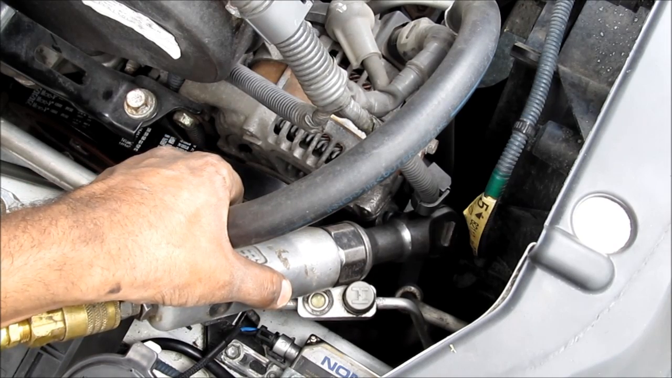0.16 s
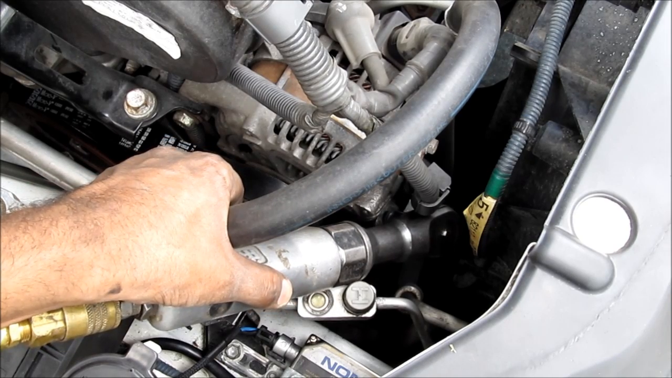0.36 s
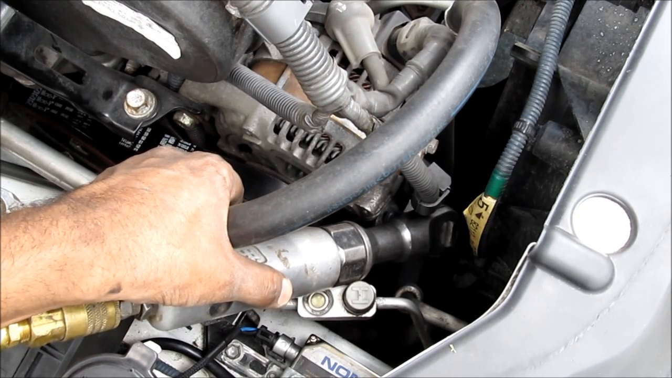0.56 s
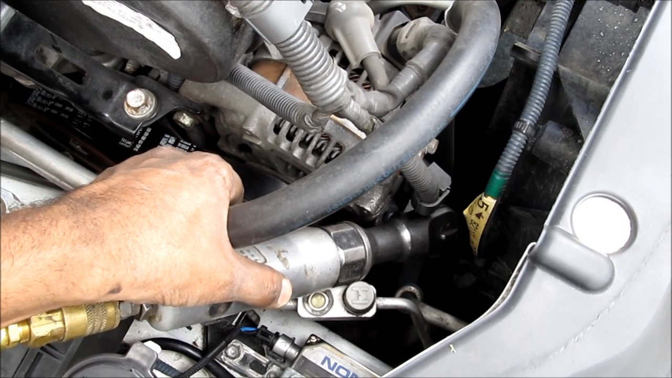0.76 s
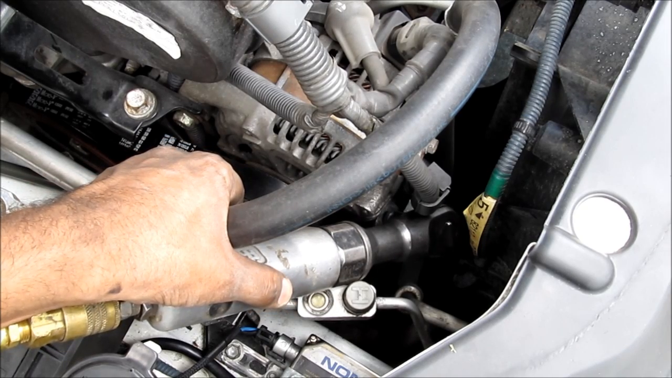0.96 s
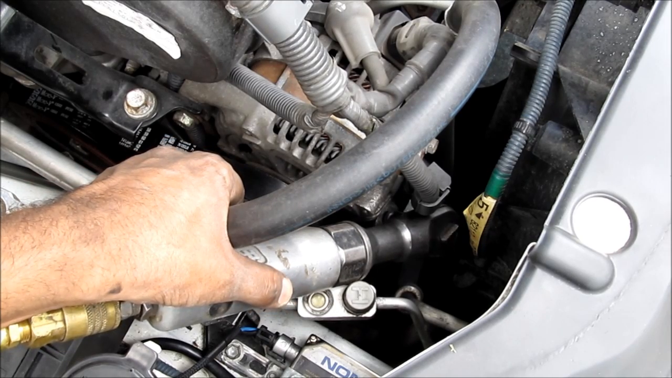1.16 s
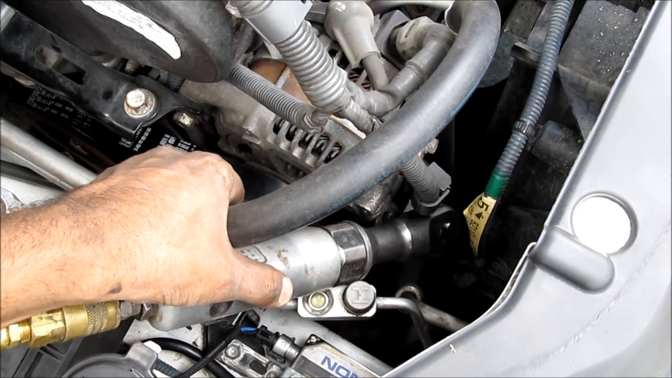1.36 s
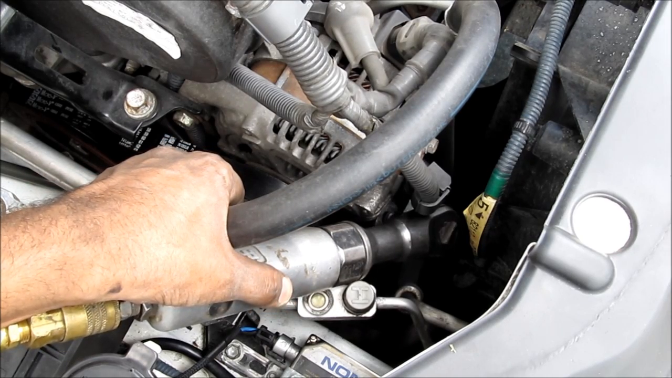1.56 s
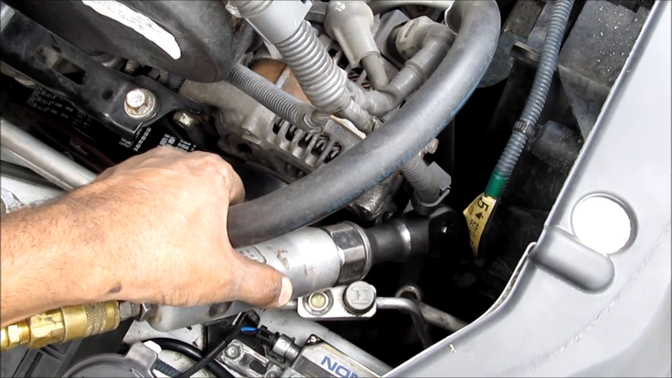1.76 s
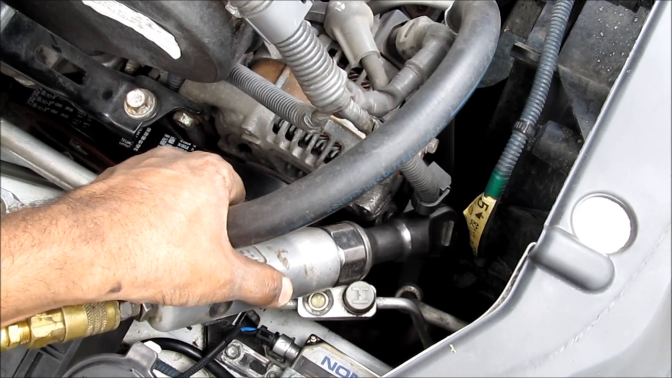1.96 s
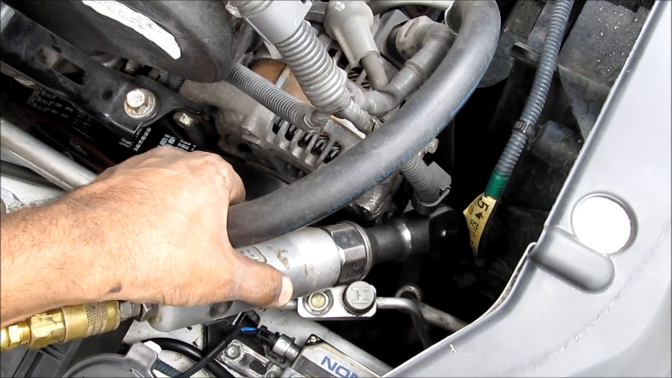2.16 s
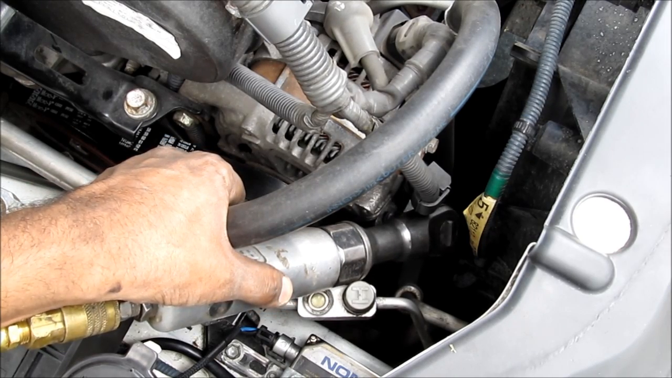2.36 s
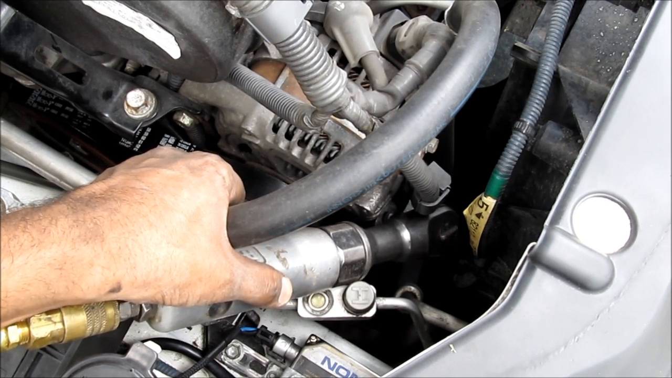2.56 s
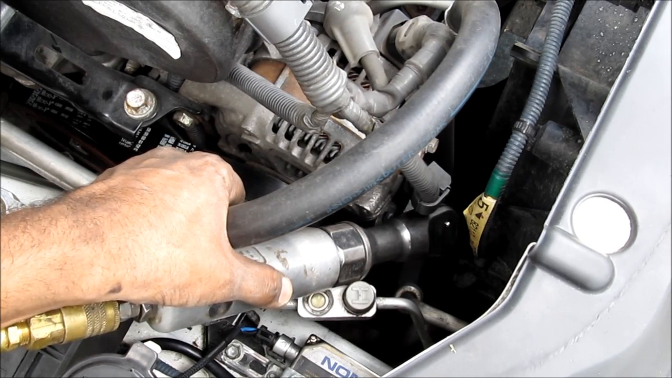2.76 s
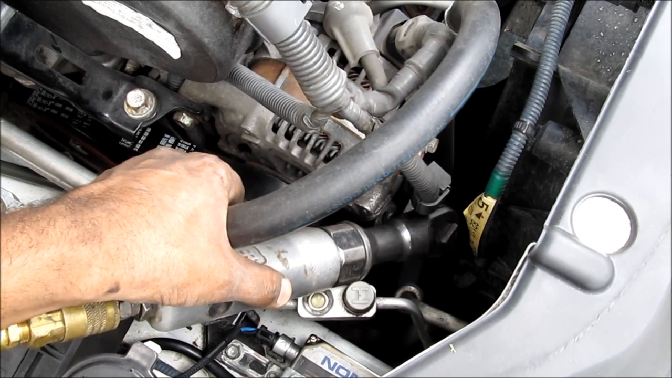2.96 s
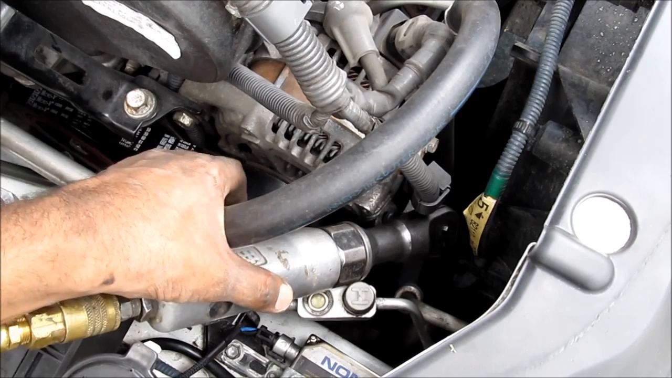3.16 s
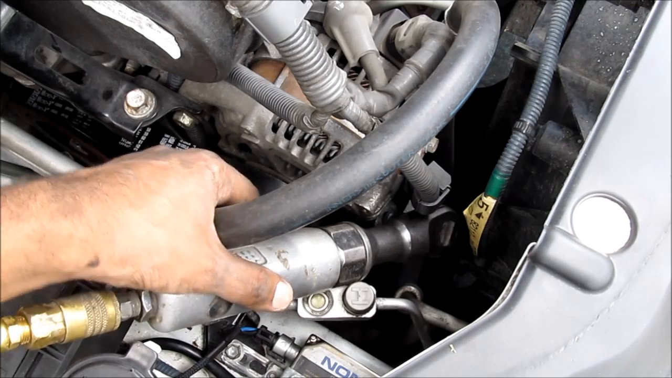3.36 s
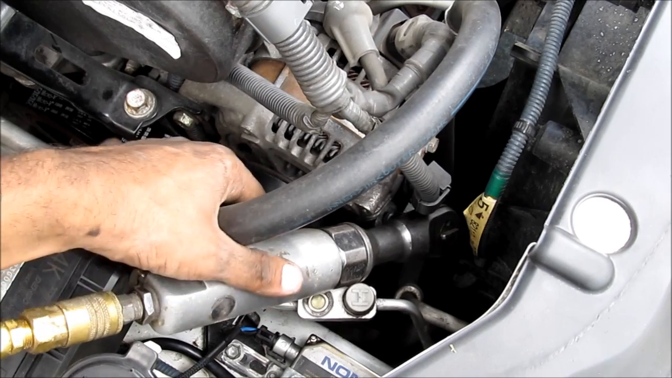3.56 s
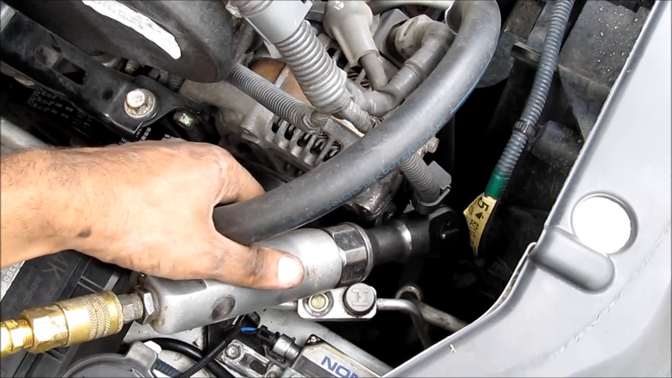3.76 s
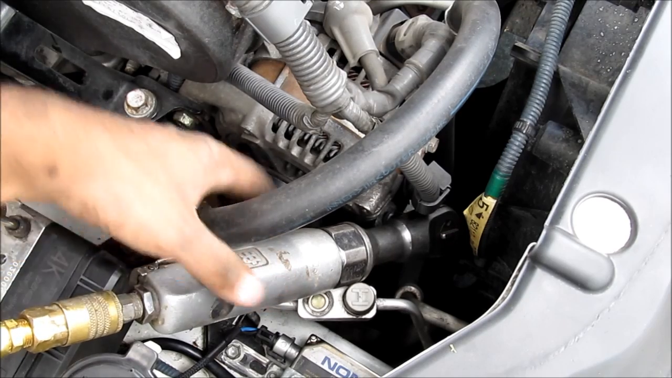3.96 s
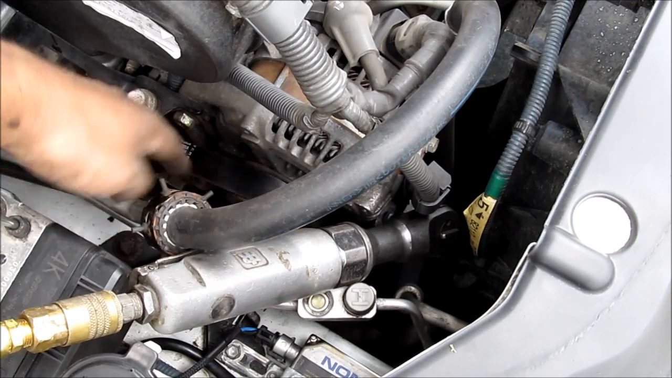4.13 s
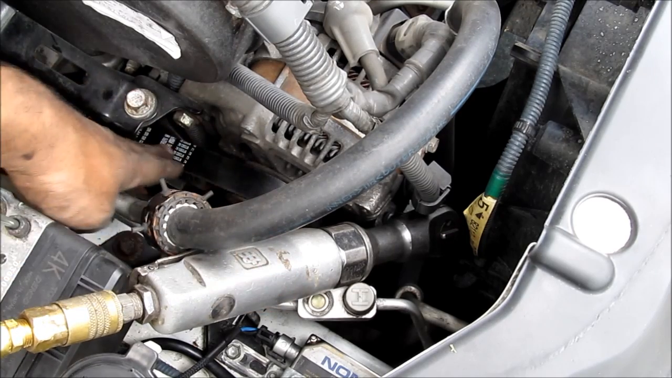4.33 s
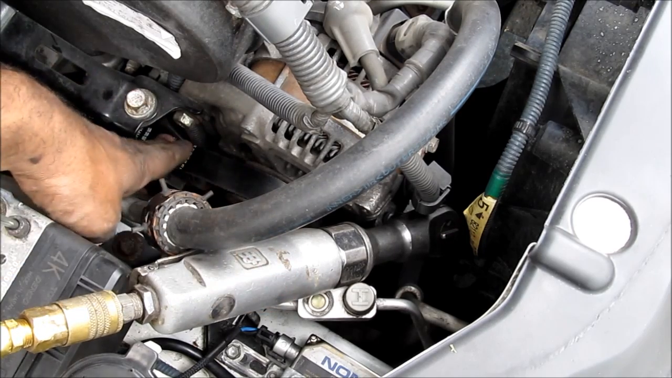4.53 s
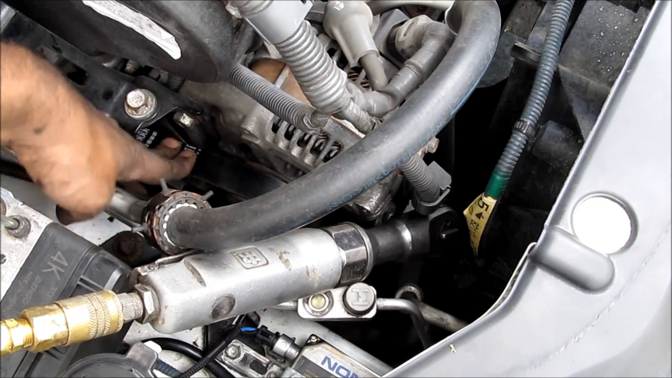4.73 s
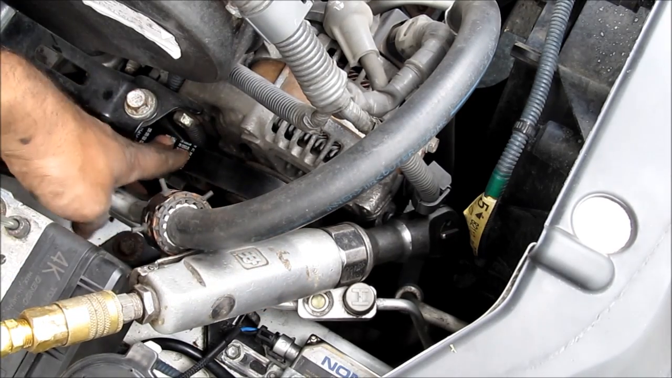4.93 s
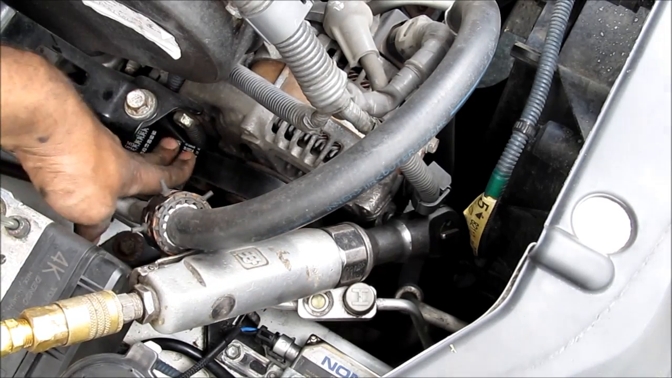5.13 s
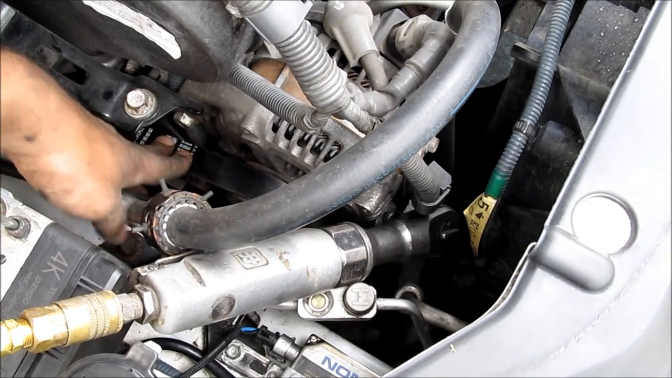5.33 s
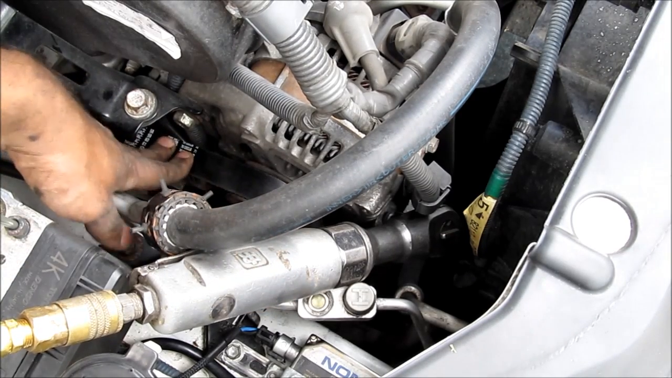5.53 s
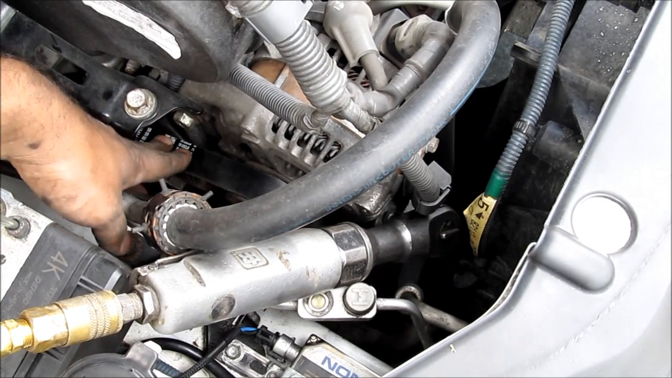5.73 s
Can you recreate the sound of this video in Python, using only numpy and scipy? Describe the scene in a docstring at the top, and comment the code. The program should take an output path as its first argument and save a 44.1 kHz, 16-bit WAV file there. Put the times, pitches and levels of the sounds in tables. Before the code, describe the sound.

A pneumatic ratchet runs close by in a car's engine bay, a bright, wide jet of exhaust air over a steady motor whine with buried metallic ticking. About halfway through, the trigger is released: the pitch drops in a quick whoop, air sighs out and the lever clicks. Then an open garage murmur slowly swells, with faint far birds and a slight hand rustle. Close stereo microphones.

```python
"""A bright jet of exhaust air over a vane motor's whine: an air ratchet spins on a bolt in a car's engine bay.
The jet is chopped, coloured noise; the whine is a stack of partials that follows the rotor.
The trigger is let go: the motor winds down with a short falling whoop, air drains, and the lever clicks home.
Then the open garage: a low outdoor murmur and a hiss, both noise, slowly swell around the microphones.
Far birds are swept and wavering tones, and a hand among the hoses is one swell of noise."""
import sys
import numpy as np
from scipy import signal
from scipy.fft import rfft, irfft
from scipy.io import wavfile
from scipy.ndimage import uniform_filter1d

SR = 44100
rng = np.random.default_rng(int(sys.argv[2]) if len(sys.argv) > 2 else 0)


def file_out(sig):
    """Save sig as 16-bit WAV at sys.argv[1]."""
    # one column per channel
    cols = np.atleast_2d(sig).T
    # limit, then scale
    lim = np.clip(cols, -1, 1)
    pcm = np.round(lim * 32767).astype(np.int16)
    wavfile.write(sys.argv[1], SR, pcm)


N = 255339
T = np.arange(N) / SR
HZ = np.fft.rfftfreq(N, 1 / SR)


def gain_of(db):
    """Decibels to a factor."""
    return 10 ** (np.asarray(db) / 20)


def evened(x):
    """Scales to rms 1."""
    return x / np.sqrt(np.mean(x ** 2) + 1e-20)


def read(points, hz):
    """Reads a spectrum table, joined on a log-frequency axis."""
    f, value = np.transpose(points)
    return np.interp(np.log(hz + 1), np.log(f + 1), value)


def add(mix, s, sound):
    """Lays a sound into the mix at time s."""
    part = mix[..., round(s * SR):][..., :sound.shape[-1]]
    part += sound[..., :part.shape[-1]]


def wander(hz):
    """Slow chance of rms 1, up to about hz changes a second."""
    return evened(irfft(rfft(rng.standard_normal(N)) * np.exp(-(HZ / hz) ** 2), N))


def swell(peak_s, rise_s, fall_s, db):
    """A rounded hump of gain that peaks at db; rise and fall each span 20 dB."""
    side_s = np.where(T < peak_s, rise_s, fall_s)
    return gain_of(db - 20 * ((T - peak_s) / side_s) ** 2)


def noise(colour_db, likeness):
    """Coloured stereo noise of rms 1 whose channels are alike by a table."""
    a, b = rfft(rng.standard_normal((2, N)))
    same = np.clip(read(likeness, HZ), -1, 1)
    mid = a * np.sqrt(1 + same)
    side = b * np.sqrt(1 - same)
    return evened(irfft(np.array([mid + side, mid - side]) * gain_of(colour_db), N))


def tint(x, colour_db):
    """Filters by a spectrum in dB, to rms 1."""
    return evened(irfft(rfft(x) * gain_of(colour_db), N))


def turbulent(x, patchy_db, flicker_db):
    """Eddies lift and drop patches of the spectrum: broad slow ones and small quick ones."""
    z = signal.stft(x, nperseg=256, noverlap=192)[2]
    slow, quick = rng.standard_normal((2, *z.shape[1:]))
    # axis 0 is frequency, axis 1 is time
    slow = uniform_filter1d(uniform_filter1d(slow, size=36, axis=1), size=22, axis=0)
    quick = uniform_filter1d(uniform_filter1d(quick, size=7, axis=1), size=9, axis=0)
    z = z * gain_of(patchy_db * evened(slow) + flicker_db * evened(quick))
    return signal.istft(z, nperseg=256, noverlap=192)[1][:, :N]


def reflect(x, t60, wet_db, dull_hz=np.inf):
    """Adds a dying tail of reflections, different at each ear and weaker above dull_hz."""
    t = T[:SR // 2]
    dulling = 1 / (1 + (np.fft.rfftfreq(len(t), 1 / SR) / dull_hz) ** 2)
    taps = irfft(rfft(rng.standard_normal((2, len(t)))) * dulling, len(t))
    tail = taps * gain_of(-60 * t / t60) * (t > .002)
    tail /= np.linalg.norm(tail, axis=1, keepdims=True)
    return x + gain_of(wet_db) * signal.fftconvolve(np.atleast_2d(x), tail, axes=1)[:, :N]


SHUT_S, SHUT_TIME_S = 3.5, .021  # the valve is half shut at SHUT_S; how gradually it closes


def valve():
    """How far the throttle is open: 1 while the trigger is held, then smoothly down to 0."""
    return .5 - .5 * np.tanh((T - SHUT_S) / (2 * SHUT_TIME_S))


# Speed of the motor while the trigger is held: (time [s], vane pulses per second [Hz])
HELD_SPEED = [(0.0, 1048), (0.48, 1029), (1.29, 1020), (2.96, 1018), (3.3, 984), (3.42, 984.8)]


def held_speed():
    """The vane rate in Hz under air, before any coasting."""
    s, hz = np.transpose(HELD_SPEED)
    return np.interp(T, s, hz)


def airflow(usual_hz=1020, drive_db_per_hz=.0125):
    """The air through the tool, 1 at its usual speed; more air makes it both faster and louder."""
    return valve() * gain_of(drive_db_per_hz * (held_speed() - usual_hz))


def rotor(jitter=.002, jitter_hz=25, coast_s=3.474, half_speed_s=.066, coast_power=2.1):
    """The vane rate, a little unsteady, and the count of vanes passed; from coast_s the rotor slows,
    and it is at half speed half_speed_s later."""
    coast = 1 / (1 + (np.maximum(T - coast_s, 0) / half_speed_s) ** coast_power)
    hz = held_speed() * coast * (1 + jitter * wander(jitter_hz))
    vanes_passed = np.cumsum(hz) / SR
    return hz, vanes_passed


def bay(x, echo_db=-17, count=24):
    """Hard parts all round the tool return the jet 1 to 16 ms later and comb its spectrum."""
    delays_s = rng.uniform(.001, .016, (2, count))
    taps = np.zeros((2, N))
    np.put_along_axis(taps, (delays_s * SR).astype(int), rng.choice([-1., 1.], delays_s.shape), 1)
    treble = HZ / (HZ + 1500)  # small parts reflect short waves best
    echoes = gain_of(echo_db) * treble * rfft(taps) / np.sqrt(count)
    return evened(irfft(rfft(x) * (1 + echoes), N))


# Broad colour of the jet: (frequency [Hz], relative level per Hz [dB])
JET_SPECTRUM = [(25, -60), (50, -45.5), (90, -29.5), (200, -24.5), (330, -16.5), (650, -14.5), (1200, -12),
                (2000, -7.5), (3200, -5.5), (4800, -6), (8000, -2.5), (10200, -1), (11600, -2.5),
                (15700, -11)]
# Resonances and dips of the exhaust ports and the bay: (frequency [Hz], width [Hz], level [dB])
PORT_RESONANCES = [(300, 70, 2), (390, 90, 2.5), (790, 70, 4), (1280, 70, 4), (2950, 260, 3.5),
                   (4120, 200, 2.5), (4550, 400, -1.5), (5610, 110, 2.5), (6160, 140, 2.5),
                   (6800, 170, 2.5), (8320, 150, 2), (9150, 130, 3), (9570, 100, 3), (10200, 180, 5),
                   (10480, 200, 4), (11040, 150, 3.5), (11950, 160, -3), (12580, 200, 3.5),
                   (14900, 250, -2.5), (15340, 220, 4)]
# Likeness of the jet's left and right channels: (frequency [Hz], likeness [-1 to 1])
JET_LIKENESS = [(100, 1), (400, .92), (700, .8), (1000, 0.89), (1400, 0.65), (2750, .75), (4000, .41),
                (4600, 0.27), (6000, .38), (8000, .32), (9600, .4), (10300, .8), (10900, 0.26),
                (11400, -.2), (12500, .1), (15500, .2)]
# Lean of the jet towards one side: (frequency [Hz], left minus right [dB])
JET_LEAN = [(60, 1.5), (99, 2.5), (160, -0.5), (270, 0), (450, -0.5), (740, -1), (1220, 0.5), (2010, 1),
            (3330, 0), (5500, 2.5), (9080, 2.0), (15000, 4.0)]


def exhaust(vanes_passed, level_db=-16.5, chop=.19, dull_hz=11000):
    """The air jet, chopped by the vanes and coloured by its ports; it loses its top first as the valve shuts."""
    colour_db = read(JET_SPECTRUM, HZ)
    for hz, width, db in PORT_RESONANCES:
        colour_db += db / (1 + (2 * (HZ - hz) / width) ** 2)
    lean_db = read(JET_LEAN, HZ) * np.array([[.5], [-.5]])
    jet = turbulent(noise(0, JET_LIKENESS), patchy_db=.65, flicker_db=.31)
    jet *= 1 + chop * np.cos(2 * np.pi * vanes_passed)
    jet = bay(tint(jet, colour_db + lean_db))
    dull = irfft(rfft(jet) / (1 + (HZ / dull_hz) ** 4), N)
    bright = jet - dull
    return (dull + bright * valve()) * gain_of(level_db) * airflow()


# How well the housing radiates a partial of the motor, before the tilt per octave:
# (frequency [Hz], rms level [dB])
HOUSING_RESPONSE = [(120, -57), (260, -32), (400, -19.5), (530, -26), (610, -35), (700, -39), (800, -28),
                    (920, -41.5), (1030, -37.5), (1350, -33), (1550, -60), (1780, -33), (1930, -51),
                    (2005, -34), (2045, -38), (2085, -50.5), (3060, -43), (4100, -32.5), (6100, -33),
                    (7500, -54.5), (15000, -56)]


def whine(hz, vanes_passed, octave_db=-3.1, ear_turns=.055, wall_db=-15, wall_delay_s=.033):
    """Each vane lets out a puff; as the rate falls, the fundamental sweeps through the housing's low resonance."""
    out = np.zeros((2, N))
    for k in range(1, 8):
        waver_db = 1.2 if k == 1 else 2.2
        partial_db = read(HOUSING_RESPONSE, k * hz) + octave_db * np.log2(k) + waver_db * wander(24)
        # higher partials reach the two ears less in step
        apart = min(ear_turns * k * k, 1 / 6) * np.array([[-.5], [.5]])
        cycles = k * vanes_passed + rng.random() + apart
        out += gain_of(partial_db) * np.sqrt(2) * np.cos(2 * np.pi * cycles)
    # the coasting rotor pumps the air left in its chambers
    pumping = swell(peak_s=3.541, rise_s=.026, fall_s=.048, db=3.3)
    out *= airflow() + pumping
    add(out, wall_delay_s, out * gain_of(wall_db))  # thrown back by a wall
    return reflect(out, t60=.08, wet_db=-20)


# Shaking of the ratchet head: (multiple of the stroke rate, rms level [dB])
STROKE_PARTIALS = [(2, -78.5), (3, -63), (4, -68), (5, -67), (7, -65)]


def head(vanes_passed, vanes_per_stroke=22.1, ear_turns=.06):
    """The geared-down crank rocks the ratchet head and shakes the tool at low multiples of its stroke."""
    strokes = vanes_passed / vanes_per_stroke
    apart = ear_turns * np.array([[-.5], [.5]])  # the two ears hear it slightly out of step
    shake = np.zeros((2, N))
    for k, db in STROKE_PARTIALS:
        cycles = round(k) * strokes + rng.random() + apart
        shake += gain_of(db + 2 * wander(8)) * np.sqrt(2) * np.sin(2 * np.pi * cycles)
    return reflect(shake * airflow(), t60=.1, wet_db=-15)


# Ringing of the steel head when the pawl catches a tooth hard:
# (frequency [Hz], relative level [dB], time to fall 60 dB [s])
PAWL_RING = [(2970, -4, .03), (3115, -0.5, .025), (4380, -4.5, 0.022), (6370, -9, .015), (8330, 3.5, 0.023)]


def pawl(per_s=45, size_db=4, level_db=-35):
    """Uneven ticks of the pawl ring the steel head, mostly buried in the jet."""
    sizes = gain_of(size_db * np.minimum(rng.exponential(1, N), 3))
    ticks = (rng.random(N) < per_s / SR) * sizes
    t = T[:SR // 20]
    ring = sum(gain_of(db - 60 * t / t60) * np.sin(2 * np.pi * hz * t) for hz, db, t60 in PAWL_RING)
    no_bass = signal.butter(2, 1500, "highpass", fs=SR)
    chatter = evened(signal.lfilter(*no_bass, signal.oaconvolve(ticks, ring)[:N]))
    return reflect(chatter * gain_of(level_db) * airflow(), t60=.038, wet_db=-11)


# Colour of the outdoor murmur: (frequency [Hz], relative level per Hz [dB])
MURMUR_SPECTRUM = [(18, -18.5), (35, -9), (60, -7.5), (92, -2.5), (125, 2.5), (190, -6), (250, -5),
                   (310, -8.5), (400, -7.5), (550, -13), (900, -15.5), (1500, -22.5), (2600, -40.5)]
# Colour of the faint hiss of the air: (frequency [Hz], relative level per Hz [dB])
AIR_SPECTRUM = [(900, -12), (1700, 0), (3200, -2), (4500, -4.5), (5400, -6.5), (6300, -12), (7700, -5.5),
                (8250, -6.5), (9200, -10), (11200, -7), (12300, -11.5), (15500, -16)]
# Colour of the hand on a hose: (frequency [Hz], relative level per Hz [dB])
BRUSH_SPECTRUM = [(500, -11), (1500, 1), (4000, 2), (7000, -3), (15000, -7)]
# Likeness of the surroundings at left and right: (frequency [Hz], likeness [-1 to 1])
ROOM_LIKENESS = [(50, 0.885), (130, 0.99), (220, .88), (400, 0.9), (600, 0.36), (1000, .5), (1600, -0.081),
                 (2400, -0.27), (6000, 0), (15000, 0.25)]


def garage(murmur_db=-62.5, murmur_db_per_s=3.5, air_db=-69.5, air_db_per_s=4, under_tool_db=-15.5):
    """Outdoor murmur and hiss, fainter while the tool runs and then swelling, and one brush of a hand on a hose."""
    quiet_s = np.maximum(T - SHUT_S, 0)
    murmur = noise(read(MURMUR_SPECTRUM, HZ), ROOM_LIKENESS) * gain_of(murmur_db + murmur_db_per_s * quiet_s)
    air = noise(read(AIR_SPECTRUM, HZ), ROOM_LIKENESS) * gain_of(air_db + air_db_per_s * quiet_s)
    brush = noise(read(BRUSH_SPECTRUM, HZ), ROOM_LIKENESS)
    brush *= swell(peak_s=4.985, rise_s=.12, fall_s=.04, db=-58.5)
    surroundings = turbulent(murmur + air + brush, patchy_db=.96, flicker_db=.5)
    return surroundings * gain_of(under_tool_db * valve())


# Colour of the draining air: (frequency [Hz], relative level per Hz [dB])
DRAIN_SPECTRUM = [(30, -61), (120, -26), (300, -4.5), (700, 5), (1500, -2.5), (2100, 0), (3100, 5.5),
                  (4200, -10.5), (5300, -5.5), (7800, -3), (8900, 3.5), (9900, -2), (12500, -14),
                  (15500, -19)]


def sigh(vanes_passed, chop=.35):
    """The last air leaves the slowing motor in duller puffs and dies away in the garage."""
    puffs = noise(0, JET_LIKENESS) * (1 + chop * np.cos(2 * np.pi * vanes_passed))
    draining = swell(peak_s=3.532, rise_s=.07, fall_s=.068, db=-29.5)
    return reflect(tint(puffs, read(DRAIN_SPECTRUM, HZ)) * draining, t60=.41, wet_db=-16, dull_hz=6500)


# Clicks of the lever and of things touched:
# (time [s], level before the decay [dB], centre [Hz], width [octaves], time to fall 60 dB [s])
KNOCKS = [(3.613, -42, 2530, 0.43, 0.04), (3.657, -52, 2600, 0.45, 0.072), (3.662, -42, 8100, 0.25, 0.044),
          (3.664, -45.5, 2700, .6, 0.045), (3.681, -44, 2550, .45, 0.04), (4.167, -64, 5000, 0.86, 0.048),
          (5.388, -54, 2400, 0.17, 0.04), (5.45, -66, 7500, .4, .04)]


def clicks(attack_s=.0012):
    """Short knocks, each a dying burst in one broad band."""
    out, t = np.zeros((2, N)), T[:SR // 5]
    hz = np.fft.rfftfreq(len(t), 1 / SR) + 1
    for s, db, centre_hz, octaves, t60 in KNOCKS:
        band = np.exp(-.5 * (np.log2(hz / centre_hz) / octaves) ** 2)
        burst = evened(irfft(rfft(rng.standard_normal((2, len(t)))) * band, len(t)))
        burst = burst + .24 * burst[::-1]  # each channel leaks a little into the other
        add(out, s, burst * np.minimum(t / attack_s, 1) * gain_of(db - 60 * t / t60))
    return reflect(out, t60=.25, wet_db=-24)


# Thin far whistles and squeaks, levels before the echoes:
# (time [s], length [s], pitch [Hz], rms level [dB], width of the waver [Hz])
FAR_WHISTLES = [(3.775, .06, 5400, -68, 140), (3.78, .065, 2990, -69, 60), (3.762, .04, 5150, -73, 400),
                (3.98, .38, 2120, -78, 40), (4.35, .06, 2950, -75, 70), (4.46, 1.02, 3060, -77.5, 110),
                (4.43, .08, 8200, -79, 250), (4.83, .06, 8250, -78, 250), (5.18, .05, 2980, -68, 80),
                (5.185, .03, 1700, -69, 150), (5.285, .05, 3000, -71, 80), (5.4, .39, 5350, -80, 160),
                (5.56, .15, 2540, -72, 120), (5.66, .11, 8200, -74, 170)]


def whistles(note_s=.1, note_dip=.5):
    """Thin tones, wavering by chance in strength and pitch, that throb in short notes."""
    out = np.zeros(N)
    for s, seconds, hz, db, width in FAR_WHISTLES:
        t = np.arange(0, seconds, 1 / SR)
        waver = (wander(width) + 1j * wander(width))[:len(t)]
        tone = ((1 + waver) * np.exp(2j * np.pi * hz * t)).real
        note_count = max(1, round(seconds / note_s))
        notes = 1 - note_dip * np.cos(np.pi * note_count * t / seconds) ** 2
        edges = signal.windows.tukey(len(t), min(.5 * note_s / seconds, 1))
        add(out, s, evened(tone * notes * edges) * gain_of(db))
    return out


# A small bird's phrases of three falling chips, levels before the echoes: (time [s], peak level [dB])
CHIP_PHRASES = [(3.842, -64.5), (4.158, -66), (4.495, -64), (5.048, -61.5), (5.331, -60), (5.669, -58)]


def chips(chip_s=.034, top_hz=4900, end_hz=4350, gap_s=.039, first_db=-1, wall_db=-9, wall_delay_s=.06):
    """Short tones gliding down in threes, the first of each a little softer, with an echo off a wall."""
    out, t = np.zeros(N), np.arange(0, chip_s, 1 / SR)
    for s, db in CHIP_PHRASES:
        for k in range(3):
            hz = np.linspace(top_hz, end_hz, len(t)) * (1 + .006 * rng.standard_normal())
            tone = np.sin(2 * np.pi * np.cumsum(hz) / SR)
            chip = tone * np.hanning(len(t)) * gain_of(db + first_db * (k == 0))
            add(out, s + k * gap_s, chip)
            add(out, s + k * gap_s + wall_delay_s, chip * gain_of(wall_db))
    return out


def birds():
    """All the birds are far off: their reflections are nearly as strong as the direct sound."""
    return reflect(whistles() + chips(), t60=.17, wet_db=-1)


def scene():
    """The tool, then the quiet after it."""
    hz, vanes_passed = rotor()
    tool = exhaust(vanes_passed) + whine(hz, vanes_passed) + head(vanes_passed) + pawl()
    return tool + garage() + sigh(vanes_passed) + clicks() + birds()


def record(dry, notch_hz=7880, notch_width_hz=220, notch_db=-9, edge_hz=15740):
    """A narrow notch of the microphone ports, then the recorder's band limit."""
    notched = signal.lfilter(*signal.iirnotch(notch_hz, notch_hz / notch_width_hz, fs=SR), dry)
    heard = notched + gain_of(notch_db) * (dry - notched)  # the notch is only notch_db deep
    low_pass = signal.firwin(2047, edge_hz, window=("kaiser", 9), fs=SR)
    return signal.oaconvolve(heard, low_pass[None], "same")


dry = scene()
out = record(dry)
file_out(out)
```